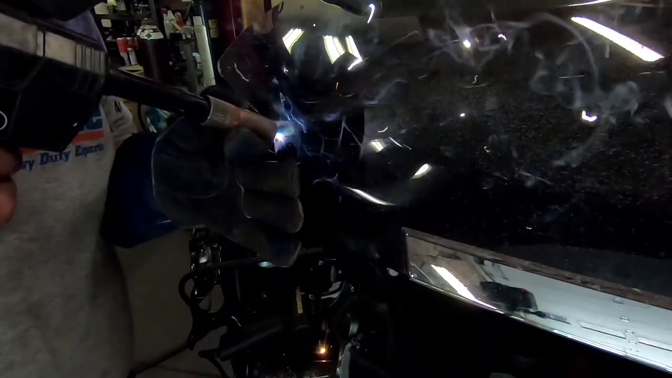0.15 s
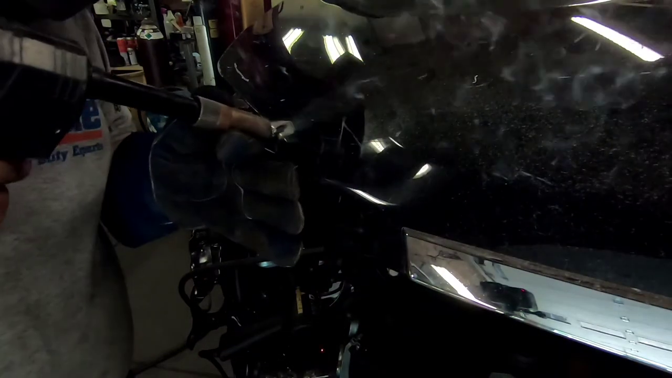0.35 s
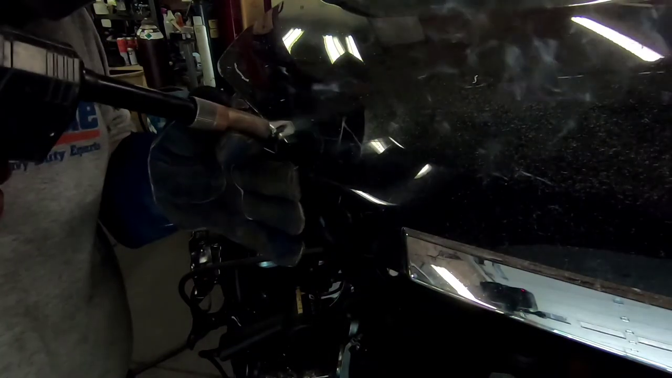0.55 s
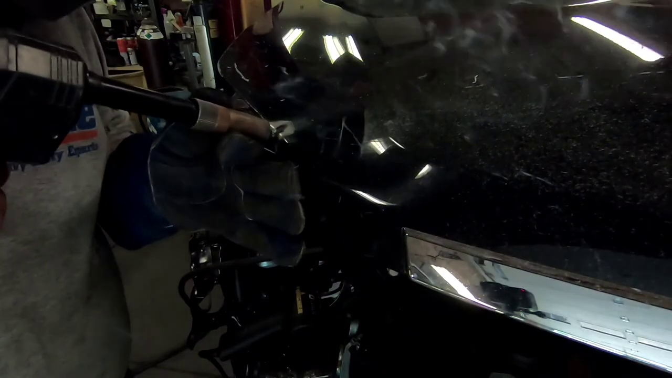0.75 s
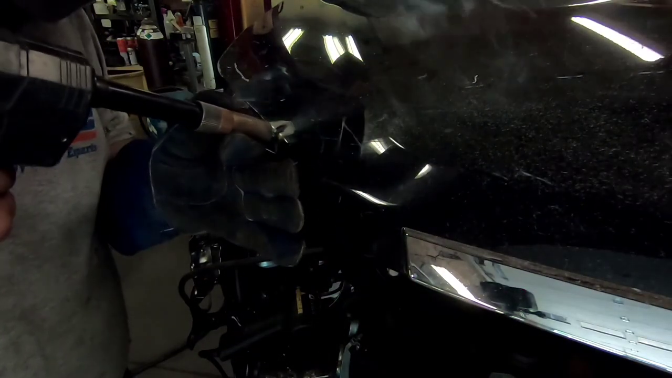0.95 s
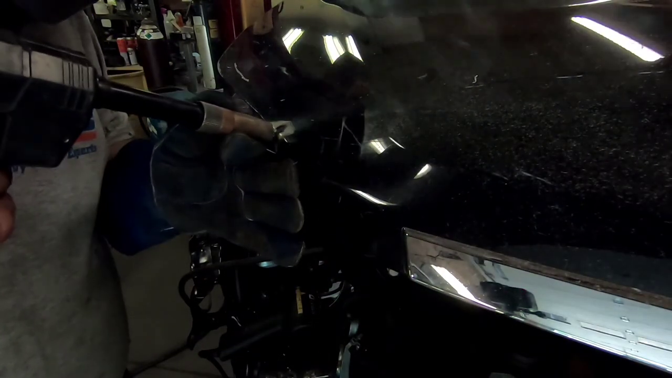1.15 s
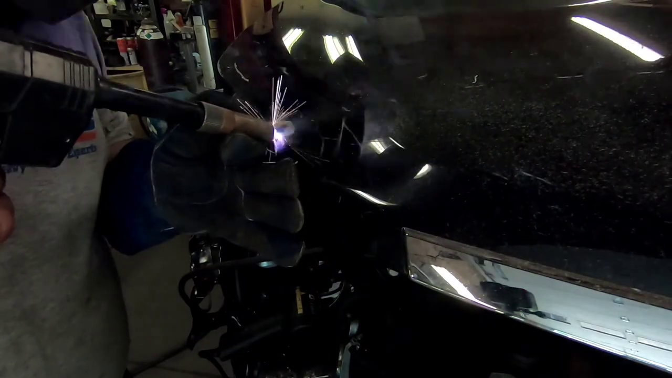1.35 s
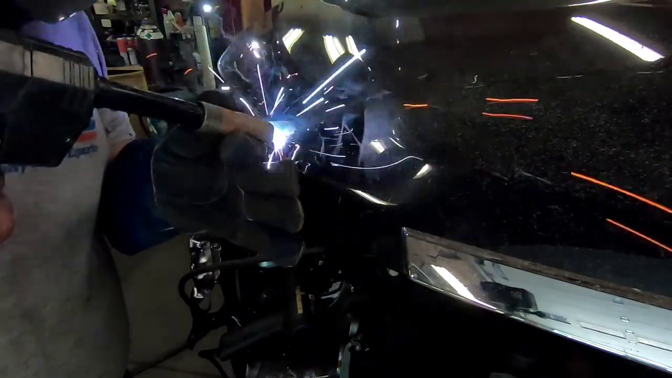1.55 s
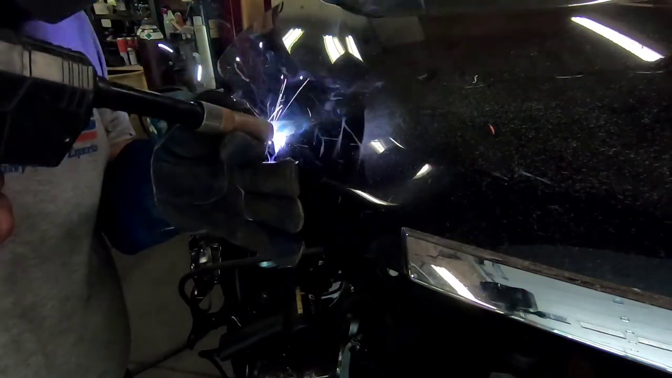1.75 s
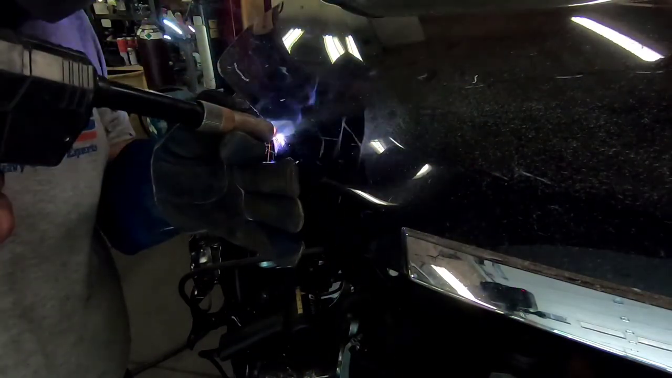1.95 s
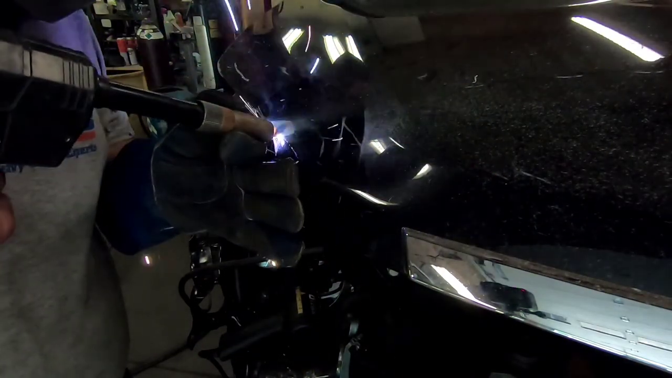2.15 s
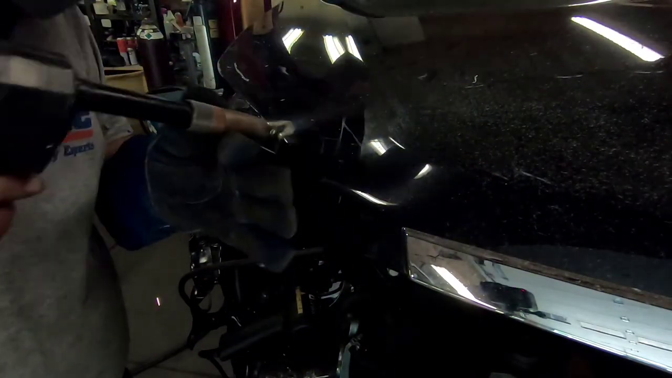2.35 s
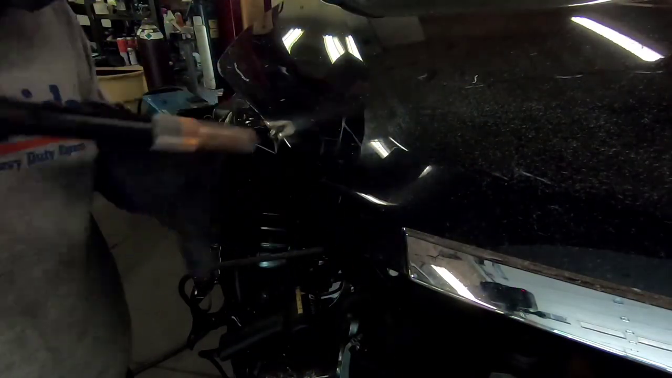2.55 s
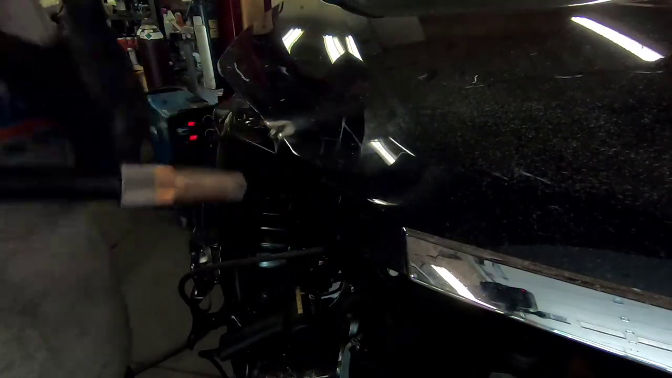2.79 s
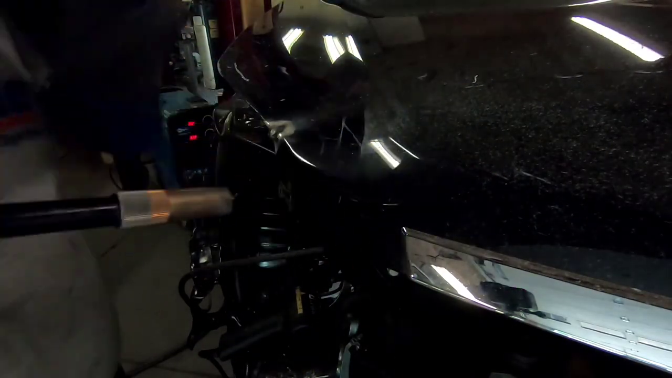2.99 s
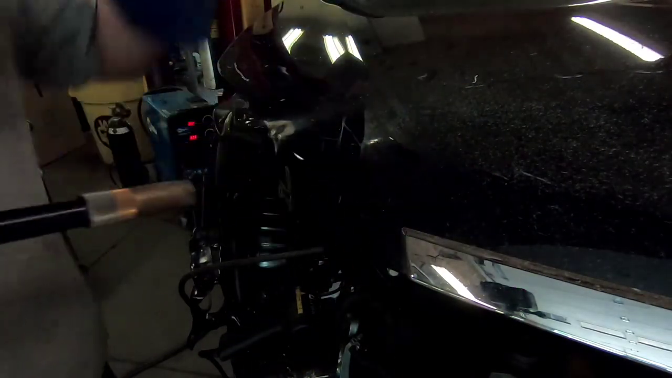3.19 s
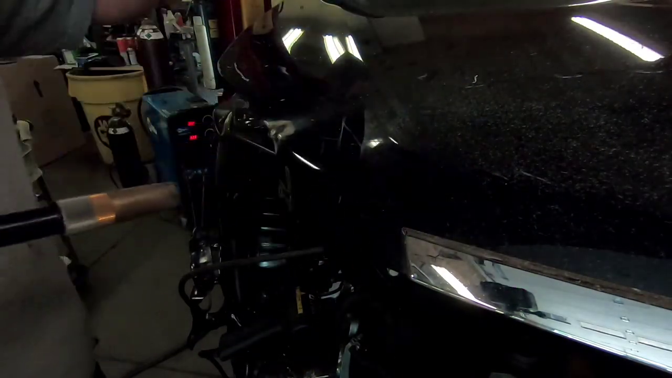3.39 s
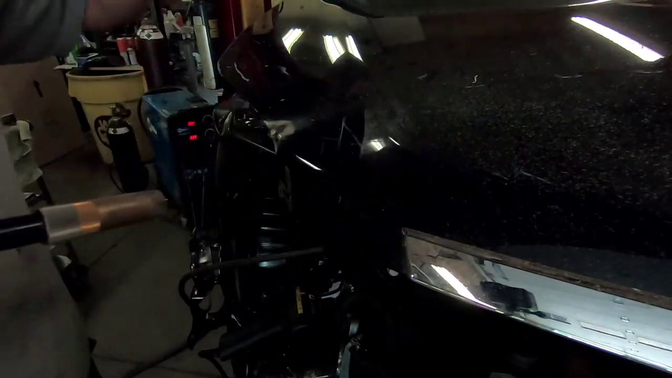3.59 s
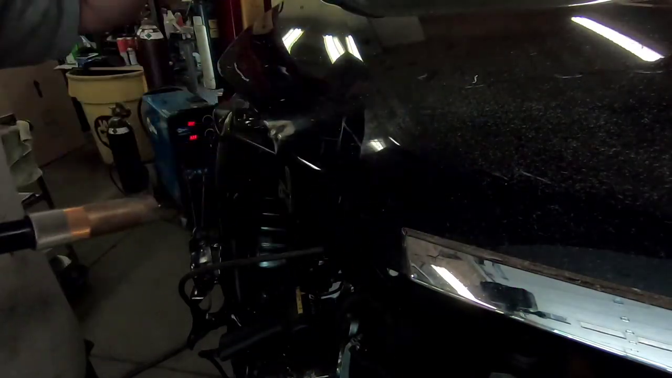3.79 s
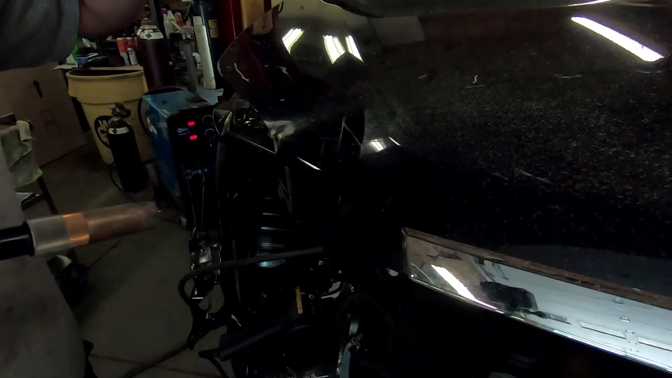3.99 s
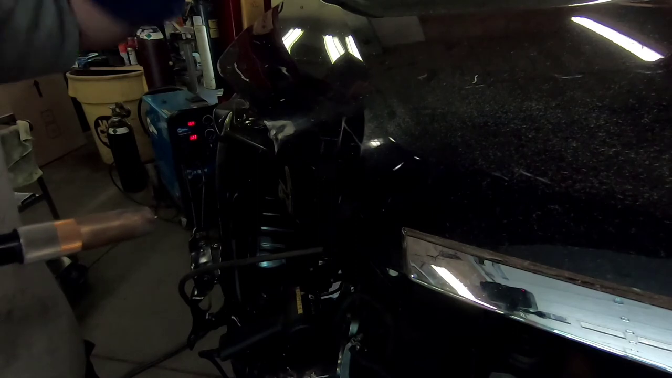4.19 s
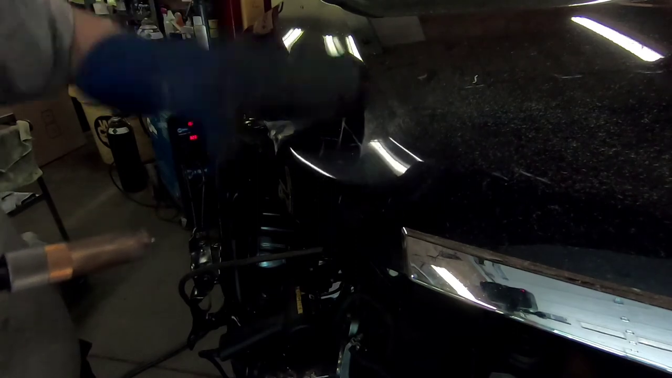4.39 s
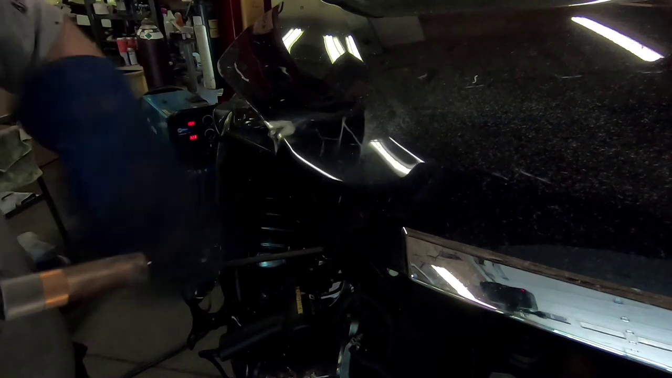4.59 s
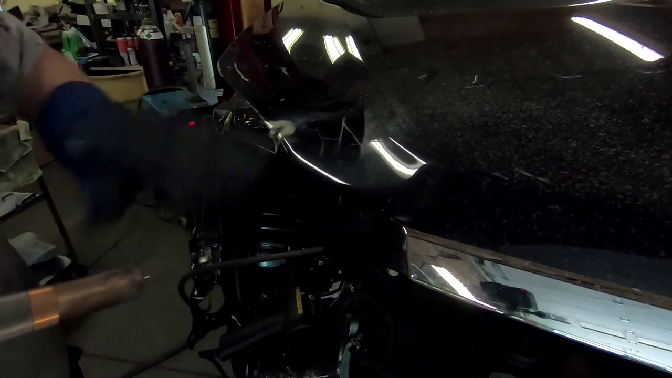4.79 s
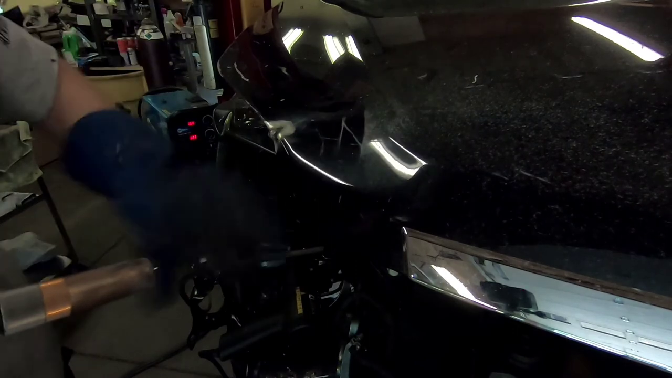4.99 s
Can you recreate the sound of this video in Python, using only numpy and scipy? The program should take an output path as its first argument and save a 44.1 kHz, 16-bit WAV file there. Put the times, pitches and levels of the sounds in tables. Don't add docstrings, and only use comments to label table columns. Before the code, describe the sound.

A dry, bright welding arc sputters very near a small two-port camera, with a short garage echo. It breaks off, a faint puff and then a strong gas hiss with a thin whistle lead to hard clicks and one bassy pop, then continuous crackle. It cuts out suddenly. Very quiet room hum, slight rustling, then heavy handling thuds, low air buffeting and a rough glove drag end it.

```python
import sys
import numpy as np
from scipy import signal
from scipy.fft import rfft, irfft
from scipy.io import wavfile
from scipy.ndimage import uniform_filter1d

SR = 44100
rng = np.random.default_rng(int(sys.argv[2]) if len(sys.argv) > 2 else 0)


def waveform_to_disk(signal):
    frames = np.transpose(np.atleast_2d(signal))
    scaled = np.clip(frames, -1, 1) * 32767
    samples = np.round(scaled).astype(np.int16)
    wavfile.write(sys.argv[1], SR, samples)


def volts(x):
    e = np.asarray(x, float) / 20
    return 10 ** e


N = 222264
T = np.arange(N) / SR
F = np.maximum(np.fft.rfftfreq(N, 1 / SR), 1)

# full at [s], level [dB], rise [dB/s], hold [s], fall [dB/s].
ARC_BURN = [
    (0.0, -32, 500, 0.207, 677.5),
    (1.385, -39, 2004, 0.018, 300.5),
    (1.51, -50.5, 299, .17, 903),
    (1.76, -30.5, 101.5, 0.5194, 496),
]
# start [s], length [s], peak [dB].
DROPLET_SPITS = [(.0011, 0.0022, -12), (.0164, .005, -8.5), (0.038, 0.0073, -9.5), (0.086, 0.0063, -10.5),
                 (0.118, .003, -11), (.1326, 0.017, -12.5), (0.1594, 0.0083, -8), (0.187, 0.018, -16),
                 (1.6922, 0.0066, -7.5), (1.713, 0.012, -10.5), (1.749, .006, -13.5),
                 (1.7718, 0.0049, -6.5), (1.8266, 0.012, -9), (1.8543, 0.017, -14.5), (1.887, 0.0075, -8.5),
                 (1.946, .012, -11), (1.9906, .006, -12.5), (2.0234, 0.0088, -10.5), (2.054, 0.0064, -8.5),
                 (2.0817, .009, -11), (2.1138, 0.012, -12.5), (2.139, 0.0058, -12), (2.15, 0.0083, -13),
                 (2.1776, 0.0062, -8.5), (2.2346, 0.0037, -10), (2.257, 0.0046, -4.5),
                 (2.286, 0.0052, -12.5)]
# start [s], length [s], peak [dB].
WIRE_POPS = [(.2328, .0005, -16.5), (1.4012, .0005, -4.5), (1.433, .0005, -9.5), (1.4424, .0005, -5),
             (1.4525, .005, -13), (1.4899, .0005, -6), (1.4909, .0005, -2.5), (1.5985, .0005, -11),
             (1.5999, .0005, -4.5), (1.608, .004, -12), (1.6455, .0005, -14.5), (1.677, .002, -9)]
# frequency [Hz], level [dB per Hz].
CLICK_COLOUR = [(35, -43.5), (60, -35), (163, -3), (629, -9), (892, 0), (1320, -2.5), (2010, 0.5),
                (2990, 0.5), (3440, 2), (4140, -6.5), (5480, -1.5), (8520, -10.5), (9570, -19),
                (15600, -54.5)]
# frequency [Hz], width [Hz], level [dB].
TORCH_RINGS = [(1940, 310, -4.5), (2640, 160, 8), (3240, 240, -5.5), (4360, 350, 17), (5385, 200, 1),
               (6340, 210, -9), (9650, 470, 20.5)]
# frequency [Hz], level [dB per Hz].
HUM_COLOUR = [(12, -48.5), (20, -6.5), (48, 0), (85, -16.5), (145, -2.5), (241, -3), (380, -14),
              (434, -7.5), (496, -18), (553, -10.5), (1020, -6.5), (2410, -25.5), (3060, -28.5),
              (7610, -41), (12000, -77.5), (15600, -101), (22000, -120)]
# frequency [Hz], likeness [0 to 1].
HUM_LIKENESS = [(60, 0.92), (130, 0.97), (290, 0.96), (640, 0.64), (1400, .35), (3000, 0.23), (7000, 0.05)]
# time [s], gain [dB].
ROOM_GAIN = [(0.0, -49), (.25, -58.5), (.5, -56.5), (1.1, -52), (2.3, -54), (3.0, -49.5), (4.4, -51.5),
             (4.65, -55), (5.04, -50.5)]
# full at [s], level [dB], rise [dB/s], hold [s], fall [dB/s].
FAN_DRONE = [
    (.87, -62.5, 30.7, 0.032, 7.4),
    (2.89, -56, 35.5, 0.041, 90),
]
# full at [s], level [dB], rise [dB/s], hold [s], fall [dB/s].
GAS_RUSH = [
    (1.143, -23.5, 1190, 0.045, 64.5),
]
# full at [s], level [dB], rise [dB/s], hold [s], fall [dB/s].
GAS_VENTS = [
    (.77, -50, 2090, 0.0094, 105.5),
    (2.828, -62.5, 397, .002, 400),
    (2.852, -47, 3000, 0.0018, 110),
]
# full at [s], level [dB], rise [dB/s], hold [s], fall [dB/s].
CUP_WHISTLE = [
    (.77, -63, 1900, .002, 500),
    (1.146, -34, 1600, .04, 60),
    (1.15, -41, 1600, .25, 150),
]
# frequency [Hz], level [dB per Hz].
RUSH_COLOUR = [(290, -60.5), (500, -32.5), (816, -16.5), (1540, -18), (2020, -12), (2370, -7.5),
               (2690, 1.5), (3020, -6), (3540, -6), (4030, -2.5), (4520, -6), (8160, -25.5), (9700, -20.5),
               (13300, -42), (15600, -54.5)]
# frequency [Hz], level [dB per Hz].
VENT_COLOUR = [(880, -36.5), (1500, -0.5), (1990, -3), (2670, -4.5), (4040, 0.5), (9280, -13.5),
               (11700, -32), (14000, -40), (15600, -40)]
# start [s], peak [dB], frequency [Hz], time to fall 60 dB [s], left minus right [dB].
THUDS = [(1.4835, -21, 116.4, 0.052, -2), (1.4893, -6.5, 135, 0.048, 1.5), (1.4897, -10, 2000, .016, 2),
         (1.506, -38, 125, 0.029, -2), (1.53, -38, 94, 0.2, -8), (1.599, -18, 90, 0.037, 2),
         (4.456, -30.5, 198, 0.055, 0), (4.479, -8.5, 75.4, 0.028, 0), (4.502, -21, 81.5, 0.079, 6),
         (4.621, -11.5, 161, 0.026, -3), (4.641, -37, 70.2, 0.42, -19), (4.844, -36.5, 66.5, 0.65, -14),
         (5.019, -24.5, 145, 0.058, 9), (5.031, -7, 120, 0.016, 0)]
# start [s], peak [dB], centre [Hz], time to fall 60 dB [s], left minus right [dB].
TICKS = [(1.4901, -12, 2900, 0.009, 2), (1.509, -38, 3900, .04, 4), (3.044, -43, 7300, .008, 13),
         (4.365, -39, 2400, 0.019, 4), (4.4722, -25, 4800, .004, 2), (4.4726, -16, 2000, 0.005, 2.5),
         (4.4759, -18, 1300, 0.012, -2), (4.484, -24, 390, 0.052, -1), (4.607, -36, 3300, .04, 4),
         (4.624, -36, 3700, .03, 0), (4.627, -28.5, 300, 0.14, 2.5), (4.755, -53, 4600, .03, 1),
         (4.846, -37, 2000, .025, 11), (4.869, -23, 1050, 0.07, 3.5), (4.872, -25, 310, 0.17, -3),
         (5.016, -30, 2900, 0.0077, 2), (5.020, -27.5, 600, 0.13, -6), (5.030, -42, 3700, 0.012, -7.5)]
# full at [s], level [dB], rise [dB/s], hold [s], fall [dB/s].
SLEEVE_RUSTLE = [
    (3.055, -63, 2000, .002, 170),
    (3.316, -59.5, 60, 0.017, 32.5),
]
# full at [s], level [dB], rise [dB/s], hold [s], fall [dB/s].
ARM_SWISH = [
    (4.34, -56.5, 60, 0.018, 300),
    (4.365, -49.5, 3000, .01, 71),
    (4.46, -61, 60, .005, 900),
]
# full at [s], level [dB], rise [dB/s], hold [s], fall [dB/s].
GLOVE_DRAG = [
    (4.475, -44.5, 360, 0.0067, 360),
    (4.58, -38.5, 140, 0.055, 2500),
    (4.65, -58, 740, 0.077, 49),
    (5.04, -33.5, 550, .01, 100),
    (5.01, -63, 450, .03, 100),
]
# frequency [Hz], level [dB per Hz].
SLEEVE_COLOUR = [(1500, -10), (3000, -3.5), (4000, -17), (5200, -9), (8500, -16.5), (10200, -12),
                 (11000, -26), (12100, -39), (14000, -36), (15500, -67)]
# frequency [Hz], level [dB per Hz].
SWISH_COLOUR = [(710, -40), (1200, -11), (1610, 3.5), (1810, -4), (2260, 4.5), (3040, -5.5), (3680, 0),
                (3960, -12), (4590, -3), (5100, -8.5), (7870, -17), (8570, -30), (9520, -17.5),
                (15000, -58)]
# frequency [Hz], level [dB per Hz].
GLOVE_COLOUR = [(150, -17), (400, -9), (1400, -11), (2300, -18), (3800, -18.5), (5100, -20), (8000, -39),
                (10000, -39.5), (14000, -70)]
# full at [s], level [dB], rise [dB/s], hold [s], fall [dB/s].
HAND_DRAUGHT = [
    (4.49, -28.5, 2000, .1, 80),
    (4.646, -36, 200, .02, 175),
]
# left delay [ms], right delay [ms], left gain [factor], right gain [factor].
TORCH_PATHS = [(0, .024, 1, 1), (.32, .36, .12, .12), (.53, .61, .3, .14), (.75, .72, -.3, -.05),
               (1.2, 1.2, -.15, -.18), (1.62, 1.66, -.15, -.1)]
# frequency [Hz], left minus right [dB].
PORT_SHADE = [(100, -1), (1000, 1.5), (2400, 1), (4200, 0.7), (5900, -8), (6800, -5), (9500, 8.5),
              (15000, 20.5)]
# band centre [Hz], time to fall 60 dB [s], level [dB].
GARAGE_BANDS = [(125, 0.49, -36.5), (500, 0.17, -30), (1503, 0.72, -25.5), (3000, 0.76, -27),
                (6110, 0.54, -19), (10100, 0.6, -10), (13100, 0.29, -8)]

SHORT_DB, SHORT_S = -5, 0.0087
CLICK_GAP_S, CLICK_SPREAD_DB = 0.0016, 4
STRAY_GAP_S, STRAY_DB = 0.006, -16
CRACKLE_DB, SIZZLE_DB = -2.0, -13
POOL_DB, POOL_FOLLOW = -26.5, 0.63
BASS_DB = -3
STRIKE_S, STRIKE_DUCK_DB, STRIKE_FALL = 1.402, -14.5, 1300
TICK_SPAN = 1.674
DRAUGHT_PAN_DB = -9
LIMIT, RELEASE_S = 0.7, 0.02


def along(table, column, hz):
    table = np.array(table, float)
    return np.interp(np.log(hz), np.log(table[:, 0]), table[:, column])


def unit(x):
    return x / np.sqrt(np.mean(x ** 2))


def noise():
    return rng.standard_normal(N)


def colour(x, spectrum):
    return unit(irfft(rfft(x) * volts(along(spectrum, 1, F)), N))


def band(x, hz, width_hz):
    return signal.lfilter(*signal.iirpeak(hz, hz / max(width_hz, 5), SR), x)


def flicker(rate_hz, depth_db):
    step = int(SR / rate_hz)
    stairs = np.repeat(rng.standard_normal(N // step + 1), step)[:N]
    return volts(depth_db * unit(uniform_filter1d(stairs, step)))


def swell(rows):
    gain = np.zeros(N)
    for full_s, db, rise, hold_s, fall in rows:
        before = np.maximum(full_s - T, 0)
        after = np.maximum(T - full_s - hold_s, 0)
        gain += volts(db - rise * before - fall * after)
    return gain


def pan(x, db):
    return np.array([x * volts(db / 2), x * volts(-db / 2)])


def spark():
    hz = np.maximum(np.fft.rfftfreq(1024, 1 / SR), 1)
    db = along(CLICK_COLOUR, 1, hz)
    for ring_hz, width_hz, ring_db in TORCH_RINGS:
        db = db + 0.36 * (ring_db + 6) / (1 + (2 * (hz - ring_hz) / width_hz) ** 2)
    cepstrum = irfft(np.log(volts(db)))
    cepstrum[1:512] *= 2
    cepstrum[513:] = 0
    click = irfft(np.exp(rfft(cepstrum)))
    return click / click[np.abs(click).argmax()]


def shorts():
    s = np.array(DROPLET_SPITS)[:, :1]
    dips = np.clip(1 - (s - T) / SHORT_S, 0, 1) * (T < s)
    return volts(SHORT_DB * np.sum(dips, axis=0))


def snaps():
    start, length, db = np.transpose(WIRE_POPS + DROPLET_SPITS)[:, :, None]
    gap, spread, side = rng.random((len(start), 16, 3)).transpose(2, 0, 1)
    first = np.arange(16) == 0
    late = np.cumsum(np.where(first, 0, CLICK_GAP_S * (0.6 + 1.6 * gap ** 2)), axis=1)
    sign = np.where(first | (side < 0.45), -1, 1)
    softer = np.where(first, 0, CLICK_SPREAD_DB * 2 * spread ** 2)
    size = sign * volts(db - softer) * (late <= length)

    gap, spread, side = rng.random((1500, 3)).T
    at = (np.cumsum(STRAY_GAP_S * (0.4 + 1.2 * gap)) * SR).astype(int)
    out = np.zeros(2 * N)
    out[at] = np.where(side < 0.7, -1, 1) * volts(STRAY_DB + 5.1 * (spread - 0.5))
    out = out[:N] * (swell(ARC_BURN) * shorts() > volts(-35))
    np.add.at(out, ((start + late) * SR).astype(int), size)
    return out


def arc():
    click = spark()
    lead = np.roll(snaps(), -np.abs(click).argmax())

    lag = T[:1200] - T[600]
    fade = volts(-60 * np.where(lag > 0, lag / 0.016, 0.1 - lag / 0.012))
    splutter = np.convolve(np.abs(lead), fade, "same") * noise() * volts(-25)

    seeds = (rng.random(N) < 600 / SR) * np.where(rng.random(N) < 0.6, -1, 1)
    seeds = seeds * volts(7.7 * rng.random(N) ** 2)
    crackle = unit(np.convolve(unit(seeds) + 0.78 * noise(), click)[:N]) * flicker(60, 0.85)
    sizzle = unit(band(band(noise(), 7400, 4500), 6500, 6000)) * flicker(98, 2.1) * flicker(35, 1.9)
    rumble = unit(band(band(noise(), 141, 220), 170, 300))

    burn = swell(ARC_BURN)
    clicks = np.convolve(lead + splutter, click)[:N]
    fire = burn * shorts() * (volts(CRACKLE_DB) * crackle + volts(SIZZLE_DB) * sizzle)
    pool = volts(POOL_DB) * burn ** POOL_FOLLOW * (burn > volts(-60)) * rumble
    return clicks + fire + pool


def hum():
    like = np.clip(along(HUM_LIKENESS, 1, F), 0, 0.99)
    raw = rfft(rng.standard_normal((2, N))) * volts(along(HUM_COLOUR, 1, F))
    mid, side = raw * np.sqrt([1 + like, 1 - like])
    both = np.array([mid + side, mid - side])
    low = 1 / (1 + (F / 350) ** 4)
    bass = unit(irfft(both * low, N))
    rest = unit(irfft(both * (1 - low), N))
    gain = volts(np.interp(T, *np.transpose(ROOM_GAIN)))
    bass_gain = volts(BASS_DB) * gain + swell(FAN_DRONE)
    return bass * bass_gain * flicker(11, 0.81) + rest * gain * flicker(22, 0.59)


def gas():
    quell = volts(np.clip(STRIKE_FALL * (STRIKE_S - T), STRIKE_DUCK_DB, 0))
    rush = colour(noise(), RUSH_COLOUR) * flicker(150, 1.1) * swell(GAS_RUSH) * quell
    whistle = unit(band(band(noise(), 3493, 170), 3500, 400)) * swell(CUP_WHISTLE) * quell ** 0.5
    vents = colour(noise(), VENT_COLOUR) * swell(GAS_VENTS)
    return rush + whistle + vents


def thuds():
    out = np.zeros((2, N))
    for s, db, hz, t60, pan_db in THUDS:
        t = np.maximum(T - s, 0)
        swing = np.sin(2 * np.pi * hz * t) * (1 - np.exp(-t / 0.00053))
        out += pan(volts(db - 60 * t / t60) * swing, pan_db)
    return out


def ticks():
    out = np.zeros((2, N))
    for s, db, hz, t60, pan_db in TICKS:
        i = int(s * SR)
        t = T[:min(N - i, 12000)]
        edges = signal.butter(3, [hz / TICK_SPAN, hz * TICK_SPAN], "band", fs=SR, output="sos")
        hiss = rng.standard_normal(12000)[:len(t)]
        push = hiss * volts(-60 * t / t60) + 3 * (t == 0)
        crack = signal.sosfilt(edges, push)
        out[:, i:i + len(t)] += pan(volts(db) * crack / np.abs(crack).max(), pan_db)
    return out


def rub(spectrum, rows):
    grains = rng.standard_normal((2, N)) * flicker(120, 1.8)
    return colour(grains + 0.14 * grains[::-1], spectrum) * swell(rows)


def cloth():
    sleeves = rub(SLEEVE_COLOUR, SLEEVE_RUSTLE)
    return sleeves + rub(SWISH_COLOUR, ARM_SWISH) + rub(GLOVE_COLOUR, GLOVE_DRAG)


def draught():
    edges = signal.butter(2, [35, 150], "band", fs=SR, output="sos")
    eddies = unit(signal.sosfilt(edges, rng.standard_normal((2, N))))
    return eddies * pan(swell(HAND_DRAUGHT), DRAUGHT_PAN_DB)


def ports(x):
    paths = np.array(TORCH_PATHS)
    heard = []
    for side in range(2):
        delays = np.exp(-2j * np.pi * np.outer(paths[:, side] / 1000, F))
        heard.append(paths[:, 2 + side] @ delays)
    shade = volts(along(PORT_SHADE, 1, F) / 2)
    return irfft(rfft(x) * np.array(heard) * np.array([shade, 1 / shade]), N)


def garage(x):
    t = T[:SR]
    tail = np.zeros((2, SR))
    for hz, t60, db in GARAGE_BANDS:
        hiss = band(band(rng.standard_normal((2, SR)), hz, 0.78 * hz), hz, 0.78 * hz)
        dying = hiss * volts(-60 * t / t60)
        tail += volts(db) * unit(dying)
    onset = 1 - np.exp(-t / 0.005)
    return signal.fftconvolve(x[None], tail * onset / np.sqrt(SR), axes=1)[:, :N]


def scene():
    torch = arc() + gas()
    near = ticks() + thuds()
    room = garage(torch + near.mean(axis=0))
    return ports(torch) + room + near + cloth() + draught() + hum()


def roll_off(x):
    return signal.sosfilt(signal.butter(12, 15750, fs=SR, output="sos"), x)


def record(dry):
    peak = np.log(np.abs(dry).max(axis=0) + 1e-9) + T / RELEASE_S
    held = np.exp(np.maximum.accumulate(peak) - T / RELEASE_S)
    duck = uniform_filter1d(np.minimum(1, LIMIT / held) ** 1.6, size=160)
    duck = np.roll(duck, shift=200)
    mix = np.tanh(0.71 * dry * duck) / 0.67
    return roll_off(mix)


dry = scene()
out = record(dry)
waveform_to_disk(out)
```